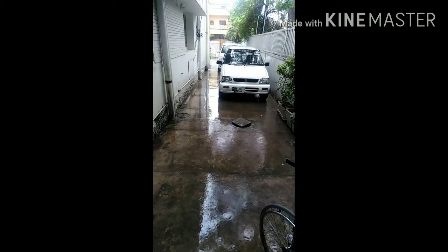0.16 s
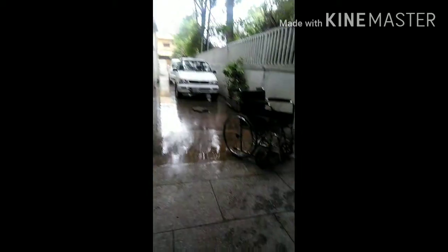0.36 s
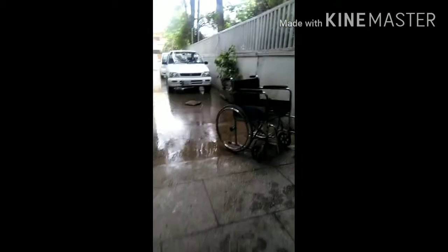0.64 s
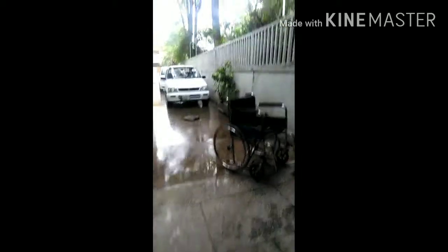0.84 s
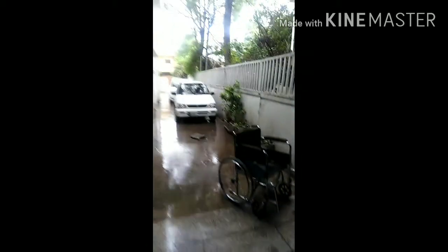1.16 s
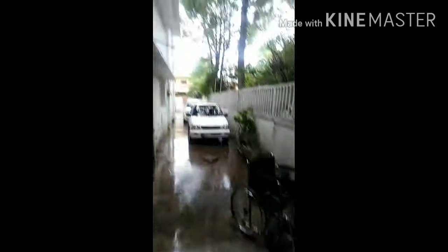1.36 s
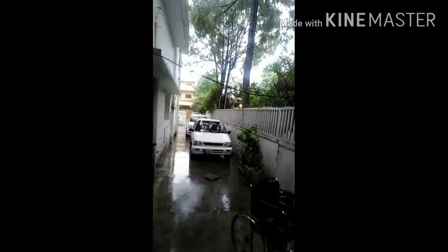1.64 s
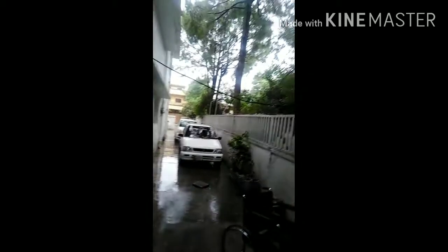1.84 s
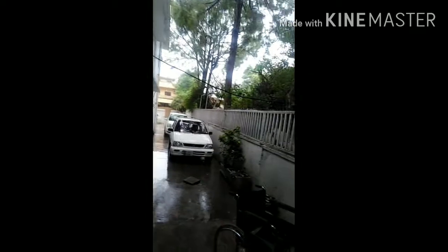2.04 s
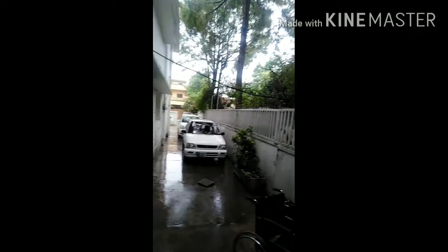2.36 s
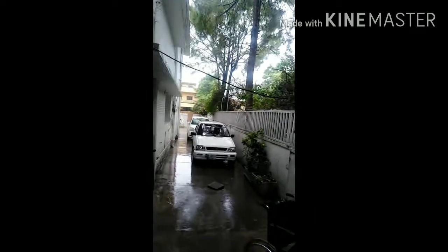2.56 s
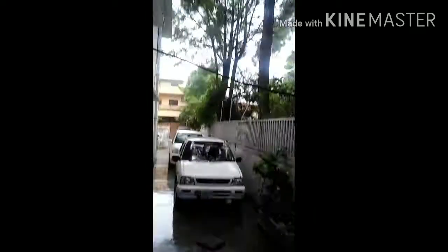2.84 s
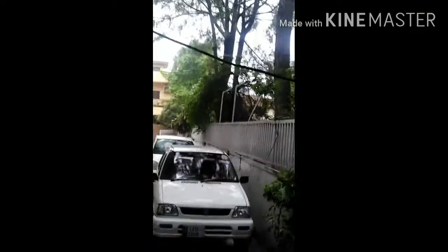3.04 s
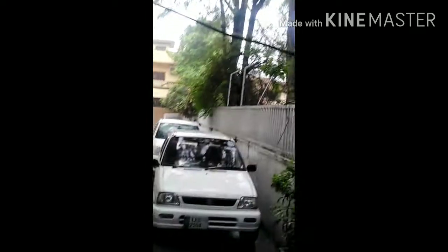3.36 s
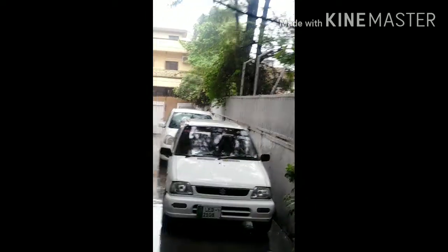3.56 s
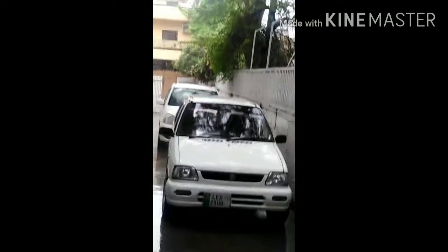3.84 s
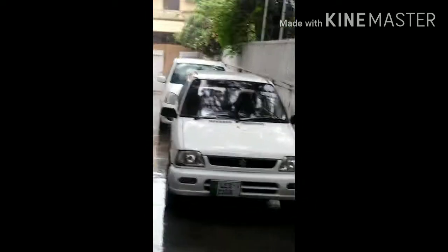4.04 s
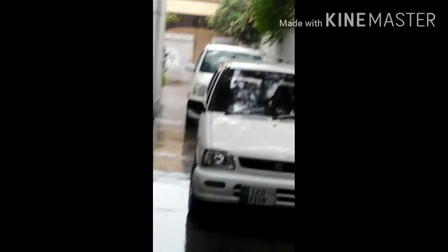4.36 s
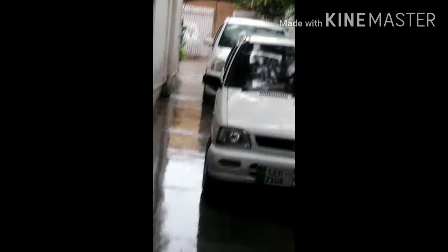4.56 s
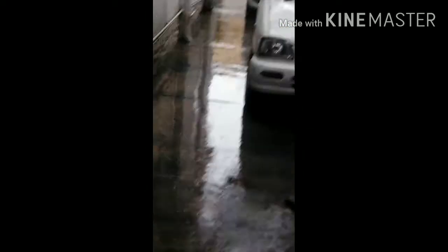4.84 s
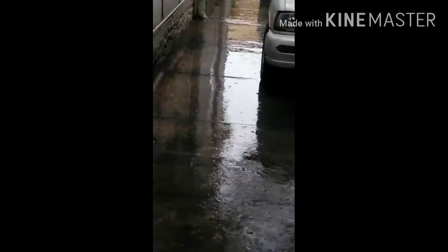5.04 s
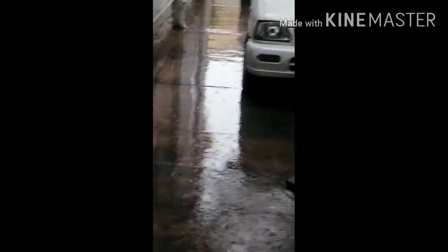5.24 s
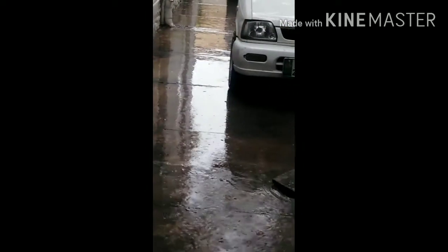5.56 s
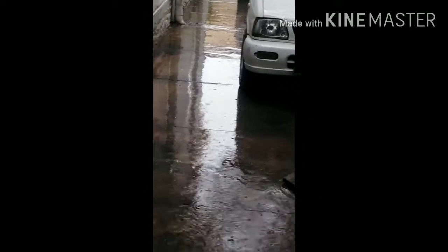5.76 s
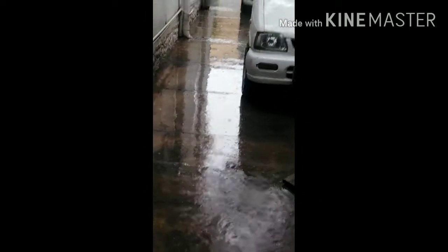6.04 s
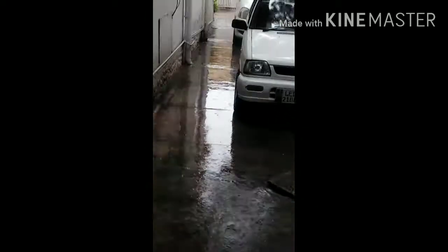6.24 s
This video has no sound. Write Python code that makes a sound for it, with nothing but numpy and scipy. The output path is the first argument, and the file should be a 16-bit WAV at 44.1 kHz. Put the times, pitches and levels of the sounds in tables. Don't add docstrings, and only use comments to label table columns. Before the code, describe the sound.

Constant rain falls between house and wall, sharp drips snapping and echoing over faint town rumble, briefly interrupted by a cut to silence.

```python
import sys
import numpy as np
from scipy import signal
from scipy.fft import rfft, irfft, next_fast_len
from scipy.io import wavfile
from scipy.ndimage import uniform_filter1d

SR = 44100
rng = np.random.default_rng(int(sys.argv[2]) if len(sys.argv) > 2 else 0)


def wrap_up_sound(samples):
    columns = np.atleast_2d(samples).T
    tamed = np.clip(columns, -1, 1)
    steps = np.round(tamed * 32767).astype(np.int16)
    wavfile.write(sys.argv[1], SR, steps)


def how_loud(loudness_db):
    steps = np.asarray(loudness_db, float) / 20
    return 10 ** steps


N = 282240

# (time [s], pitch [Hz], level [dB])
MOTOR = [(0.0, 76, -59), (1.5, 76, -62), (1.75, 76, -55), (3.4, 76, -56), (3.8, 76, -48.5), (4.7, 76, -52),
         (5.07, 75.7, -51.5), (5.25, 77.4, -53.5), (6.4, 78, -51.5)]
# (time [s], level [dB])
TRAFFIC = [(0.03, -45), (0.15, -45.5), (0.24, -39.5), (0.55, -53.5), (0.68, -44), (0.85, -46), (2.1, -48),
           (2.9, -46), (4.1, -46.5), (4.55, -44), (5.0, -48.5), (5.9, -43), (6.39, -46)]
# (time [s], level [dB])
SHOWER = [(0.03, -38), (0.21, -36), (0.62, -38), (0.68, -38.5), (1.55, -36.5), (1.86, -36), (2.2, -36.5),
          (2.65, -37.5), (2.76, -35.5), (2.93, -35), (3.45, -36), (3.77, -33.5), (3.99, -36), (4.27, -37),
          (4.41, -35.5), (5.4, -35), (6.23, -36), (6.39, -33.5)]
# (frequency [Hz], correlation [-1 to 1])
LIKENESS = [(60, 0.83), (130, 1), (290, 0.91), (640, 0.92), (1410, -0.027), (3100, -0.14), (6820, -0.24),
            (15000, 1)]
# (start [s], length [s], settled rate [Hz], level [dB])
CREAK = [
    (1.017, 0.013, 207.5, -29),
    (1.031, 0.055, 135.6, -32),
    (1.089, 0.046, 106, -42),
]
# (multiple of the slip rate [1], level [dB])
CREAK_OVERTONES = [(2, -10), (3, -19), (4, -16)]
# (time [s], peak [dB], pitch [Hz], decay by 60 dB [s])
KNOCKS = [
    (3.2995, -19, 150, .025),
]
# (time [s], rms level [dB], centre [Hz], length [s])
SPLASHES = [(0.04, -27.5, 11600, 0.059), (0.645, -34, 6450, 0.016), (0.725, -33.5, 238, 0.036),
            (0.76, -40, 6500, 0.018), (0.9, -39, 317, 0.023), (1.028, -37, 800, 0.024),
            (1.03, -31.5, 1330, 0.021), (1.361, -36, 1250, 0.019), (2.049, -39, 1490, 0.064),
            (3.504, -34.5, 2000, 0.067), (3.583, -33, 4350, 0.028), (3.706, -38, 1590, 0.036),
            (3.822, -36, 6500, 0.01), (6.205, -34.5, 3000, 0.007), (1.023, -37, 600, 0.018),
            (4.269, -34.5, 5400, 0.078), (4.449, -29, 6000, 0.015), (4.496, -38, 4030, 0.008),
            (3.25, -51, 3000, 0.01), (5.092, -48, 3300, 0.01), (0.096, -35, 5100, 0.035),
            (0.849, -49, 228, 0.06)]
# (time [s], peak [dB], pitch
# [Hz], decay by 60 dB [s])
BUBBLES = [(1.0265, -25, 1590, .03), (1.139, -27, 2150, .02), (1.634, -25, 2060, 0.023),
           (1.774, -27, 3400, .02), (2.6745, -30, 1980, .025), (2.762, -26, 1800, .012),
           (2.761, -25, 5900, .015), (1.352, -28, 1400, .03), (1.366, -28, 1000, .04),
           (2.7833, -24.5, 3360, .03), (2.889, -30, 1810, .07), (2.938, -29, 5900, 0.036),
           (3.682, -31, 1650, .09), (3.7725, -26, 2360, .02), (3.8012, -22, 1880, .015),
           (3.8015, -19, 6750, .012), (3.810, -20, 5300, 0.013), (3.8875, -18, 11400, .006),
           (5.1803, -32, 3780, 0.018), (5.8248, -26, 2000, .025), (6.1356, -27, 1980, .025),
           (6.1985, -25, 3400, .015), (6.2037, -24, 3070, .025), (3.8925, -15, 8600, .015),
           (3.896, -17, 7500, .015)]
# (time [s], peak [dB], pitch [Hz], echo [dB])
FAINT_DRIPS = [(0.4174, -33, 4010, -3.5), (0.636, -25, 4530, 1), (1.067, -25, 6680, 4),
               (1.4894, -33, 6520, -5), (1.8996, -25, 6540, 4), (1.9622, -21, 6670, 4),
               (3.1705, -17.5, 4600, 1), (3.5813, -32, 5190, -3), (4.937, -15, 7050, 1),
               (5.4396, -28, 4630, 8), (6.048, -20, 4570, 0), (0.7540, -21, 6320, -3),
               (2.7175, -35, 4700, -7), (5.427, -23, 5410, 0), (1.141, -23, 3500, 6),
               (4.434, -18, 2700, -8), (4.4364, -20, 5800, -12), (6.194, -18, 4800, -7),
               (6.1937, -17, 2600, -5), (1.1408, -24, 1800, -8), (2.7264, -13, 11500, -6),
               (6.3690, -8.5, 5200, -20)]
# (time [s], peak [dB], pitch [Hz], echo [dB], extra path by the far wall [m])
LOUD_DRIPS = [
    (.5196, -11, 12000, -12, 3.43),
    (1.1407, -7, 9500, -4, 2.47),
    (2.7262, -19, 4700, -1, 2.57),
    (3.8018, -17.5, 5300, -8, 2.92),
    (3.8880, -12, 8500, -9, 2.85),
    (4.4340, -8, 7600, -5, 3.33),
    (6.1938, -16, 8800, 4, 3.53),
    (6.3684, -4.5, 8000, -1, 3.43),
]
# (delay [s], level [dB])
REFLECTIONS = [
    (.0009, -4),
    (.0017, -9),
    (.0045, 0),
]
# (time [s], treble [dB])
LEFT_TREBLE = [(0.0, 4), (0.3, 14), (0.4, 1.5), (1.5, -3.5), (2.8, -2.5), (3.2, -1), (4.5, 0.5), (6.0, 3),
               (6.39, 6)]
# (frequency [Hz], gain [dB])
LEFT_PORT = [(30, -37.5), (68, -3), (400, -6), (500, -12), (620, -27.5), (760, -23.5), (900, -7.5),
             (2000, 0.5), (2900, -5), (4600, 1.5), (5900, 3.5), (7600, -3.5), (10300, -11.5), (13500, -30)]
RIGHT_PORT = [(30, -33.5), (68, -4.5), (240, -4), (450, -8.5), (640, -7), (850, -7), (2500, -2),
              (6200, 0.2), (8000, 3.5), (10000, -0.5), (12300, -8), (14300, -6.5)]


def rms_one(x):
    return x / np.sqrt(np.mean(x ** 2) + 1e-20)


def in_time(rows):
    s, *columns = np.transpose(rows)
    return [np.interp(np.arange(N) / SR, s, column) for column in columns]


def at_hz(points, hz):
    curve_hz, value = np.transpose(points)
    return np.interp(np.log(hz + 1), np.log(curve_hz), value)


def split_off(x, order, hz, kind):
    return signal.sosfilt(signal.butter(order, hz, kind, fs=SR, output="sos"), x)


def ring(clicks, hz, t60):
    r, w = how_loud(-60 / (t60 * SR)), 2 * np.pi * hz / SR
    return signal.lfilter([0, np.sin(w)], [1, -2 * r * np.cos(w), r * r], clicks + 1e-18)


def smooth_chance(shape, sizes):
    field = rng.standard_normal(shape)
    for axis, size in enumerate(sizes):
        for _ in range(2):
            field = uniform_filter1d(field, size, axis=axis)
    return rms_one(field)


def motor_hum(wobble_db):
    hz, level_db = in_time(MOTOR)
    wobble = wobble_db * smooth_chance((N,), (3000,))
    return np.sqrt(2) * how_loud(level_db + wobble) * np.sin(2 * np.pi * np.cumsum(hz) / SR)


def far_field(gusts_db, patchy_db, flicker_db):
    gusts_from_hz = 870
    mid, side = rfft(rng.standard_normal((2, N)))
    alike = np.clip(at_hz(LIKENESS, np.fft.rfftfreq(N, 1 / SR)), -.99, .99)
    pair = irfft(np.sqrt(1 + alike) * mid + np.sqrt(1 - alike) * side * [[1], [-1]], N)
    cells = signal.stft(pair, nperseg=512)[2]
    shape = cells.shape[1:]
    hz = np.linspace(0, SR / 2, shape[0])[:, None]
    swell = gusts_db * smooth_chance((1, shape[1]), (1, 5)) * np.clip(hz / gusts_from_hz, 0, 1)
    swell = swell + patchy_db * smooth_chance(shape, (20, 9))
    swell = swell + flicker_db * smooth_chance(shape, (40, 2))
    return rms_one(signal.istft(cells * how_loud(swell), nperseg=512)[1][:, :N])


def patter(per_s, spread_db, cycles):
    sizes = how_loud(spread_db * np.minimum(rng.exponential(1, N), 4)) * rng.choice([-1, 1], N)
    density = how_loud(3 * smooth_chance((N,), (1500,)))
    born = rng.random(N) < per_s * density / SR
    dealt = rng.integers(0, 16, N)
    sides = how_loud(rng.normal(0, 2.1, N) * [[1], [-1]])
    drops = sides * sizes * born
    out = np.zeros((2, N))
    for k, hz in enumerate(np.geomspace(3000, 13500, 16)):
        out += ring(drops * (dealt == k), hz, cycles / hz)
    return rms_one(out)


def grip():
    overshoot, settle_s, edge_s = .18, .013, .005
    t, level = np.arange(N) / SR, 0
    slips_hz = np.full(N, CREAK[0][2] * (1 + overshoot))
    for s, length_s, hz, level_db in CREAK:
        settling_hz = hz * (1 + overshoot * np.exp(-np.abs(t - s) / settle_s))
        slips_hz = np.where(t < s, slips_hz, settling_hz)
        to_edge_s = np.minimum(t - s, s + length_s - t)
        level = level + how_loud(level_db + 6.5) * np.clip(.5 + to_edge_s / edge_s, 0, 1)
    unsteady = 1 + .03 * smooth_chance((N,), (150,))
    phase = 2 * np.pi * np.cumsum(slips_hz * unsteady) / SR
    overtones = sum(how_loud(db) * np.cos(k * phase) for k, db in CREAK_OVERTONES)
    out = np.sqrt(2) * level * (np.cos(phase) + overtones)
    for s, peak_db, hz, t60 in KNOCKS:
        click = np.zeros(N)
        click[round(s * SR)] = how_loud(peak_db)
        out += ring(click, hz, t60)
    return out


def splashes():
    width_share = 0.42
    out = np.zeros((2, N))
    for s, level_db, hz, length_s in SPLASHES:
        near = np.arange(max(int((s - .3) * SR), 0), min(int((s + .3) * SR), N))
        white = rng.standard_normal((2, len(near)))
        swell = how_loud(level_db) * np.exp(-.5 * ((near / SR - s) / length_s) ** 2)
        t60 = np.log(1000) / np.pi / (width_share * hz)
        out[:, near] += swell * rms_one(ring(white, hz, t60))
    return out


def bubbles():
    rise_per_s, attack_s = 2.8, 0.0011
    out, age = np.zeros(N + 4410), np.arange(4410) / SR
    for s, peak_db, hz, t60 in BUBBLES:
        tone = np.sin(2 * np.pi * hz * age * (1 + .5 * rise_per_s * age))
        at = round(s * SR)
        out[at:at + len(age)] += tone * how_loud(peak_db - 60 * age / t60) * (1 - np.exp(-age / attack_s))
    return out[:N]


def drip_paths(echo_db, far_m, length):
    path, far_s = np.zeros(length), far_m / 343
    path[0] = 1
    for delay_s, wall_db in REFLECTIONS + [(far_s, -3), (far_s + .0008, -7)]:
        share = .3 if delay_s < .002 else 1
        path[int(delay_s * SR)] = how_loud(wall_db + echo_db * share) * rng.choice([-1, 1])
    return path


def drips(cycles, snap_db, spray_db, spray_t60):
    usual_far_m, left_lag_s = 5.2, 0.00016
    pan = how_loud(-10 * np.array([[.5], [-.5]]))
    out, age = np.zeros((2, N + 8820)), np.arange(4410) / SR
    for s, peak_db, hz, echo_db, far_m in LOUD_DRIPS + [(*row, usual_far_m) for row in FAINT_DRIPS]:
        path = drip_paths(echo_db, far_m, len(age))
        bubble = ring(path, hz, cycles / hz) + .2 * ring(path, .68 * hz, cycles / hz)
        snap = how_loud(snap_db) * (hz / 9500) ** 2 * np.diff(path, prepend=0)
        spray = rng.standard_normal((2, len(age))) * how_loud(spray_db + echo_db - 60 * age / spray_t60)
        drip = split_off(bubble + snap + spray, 2, .4 * hz, "high") * how_loud(peak_db) * pan
        for side, lag_s in enumerate((left_lag_s, 0)):
            at = round((s + lag_s) * SR)
            out[side, at:at + len(age)] += drip[side]
    return out[:, :N]


def port(x, points):
    size = next_fast_len(N + 8192)
    log_gain = np.log(how_loud(at_hz(points, np.fft.rfftfreq(size, 1 / SR))))
    cepstrum = irfft(log_gain, size)
    cepstrum[1:size // 2] *= 2
    cepstrum[size // 2 + 1:] = 0
    return irfft(rfft(x, size) * np.exp(rfft(cepstrum)), size)[:N]


def shift_treble(left):
    high = signal.butter(2, 9600, "high", fs=SR, output="sos")
    treble = signal.sosfiltfilt(high, left)
    return left + (how_loud(in_time(LEFT_TREBLE)[0]) - 1) * treble


def drop_weak_treble(x):
    treble_hz, mid_low_hz, mid_high_hz = 9300, 2000, 3600
    threshold_db = np.reshape([-75.5, -79.5], (2, 1, 1))
    hz, _, cells = signal.stft(x, SR, nperseg=2048)
    hz = hz[:1024, None]
    power = np.mean(np.abs(cells[:, :1024].reshape(2, 128, 8, -1)) ** 2, axis=2)
    limit_db = threshold_db + 2.5 * smooth_chance(power.shape, (1, 2, 3))
    limit_db = limit_db + 2.5 * smooth_chance((1, 1, power.shape[2]), (1, 1, 3))
    empty = np.repeat(power < how_loud(2 * limit_db), 8, axis=1) & (hz > treble_hz)
    starved = smooth_chance((1,) + empty.shape[1:], (1, 3, 3)) > 1.95
    empty |= starved & (hz > mid_low_hz) & (hz < mid_high_hz)
    cells[:, :1024][empty] = 0
    return signal.istft(cells, SR, nperseg=2048)[1][:, :N]


def drop_out():
    cut_s, cut_fade_s, return_s, return_fade_s = .2484, .0013, .376, .026
    held_db, held_until_s, recover_s = -7, 0.42, 0.12
    t = np.arange(N) / SR
    before = np.clip(1 - (t - cut_s) / cut_fade_s, 0, 1) ** 2
    fade = np.clip((t - return_s) / return_fade_s, 0, 1) ** 2
    low_db = held_db * np.clip(1 - (t - held_until_s) / recover_s, 0, 1)
    return before + fade * how_loud(low_db)


def scene():
    (hiss_db,), (rumble_db,) = in_time(SHOWER), in_time(TRAFFIC)
    far = far_field(gusts_db=1.06, patchy_db=0.87, flicker_db=0.26)
    split_hz = 656
    rumble = -how_loud(rumble_db + 21.5) * split_off(far, 2, split_hz, "low")
    hiss = split_off(far, 2, split_hz, "high")
    drops = how_loud(-9) * patter(per_s=1200, spread_db=2.0, cycles=3.5)
    rain = how_loud(hiss_db + 6.5) * (hiss + drops)
    near = how_loud(1.5) * drips(cycles=8.0, snap_db=1.5, spray_db=-24, spray_t60=.25)
    return motor_hum(wobble_db=1.2) + rumble + rain + grip() + splashes() + bubbles() + near


def roll_off(x):
    return signal.sosfilt(signal.butter(12, 15620, fs=SR, output="sos"), x)


def record(dry):
    ports = np.array([shift_treble(port(dry[0], LEFT_PORT)), port(dry[1], RIGHT_PORT)])
    low_pass = signal.ellip(12, .5, 60, 14250, fs=SR, output="sos")
    thinned = drop_weak_treble(signal.sosfilt(low_pass, ports))
    top = 2.5
    mix = top * np.tanh(thinned / top) * drop_out()
    return roll_off(mix)


dry = scene()
out = record(dry)
wrap_up_sound(out)
```